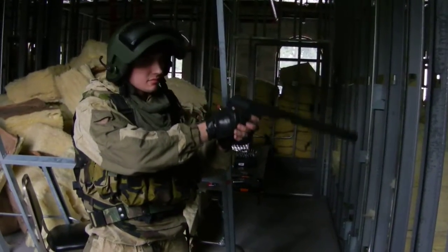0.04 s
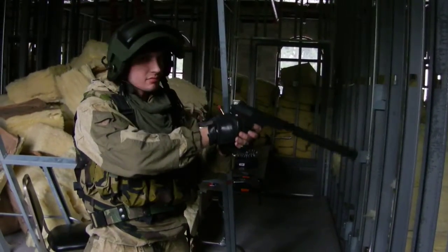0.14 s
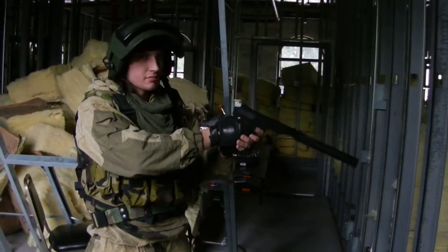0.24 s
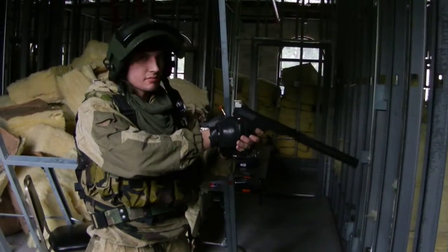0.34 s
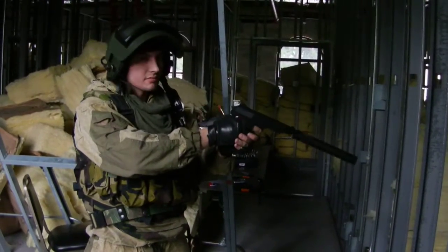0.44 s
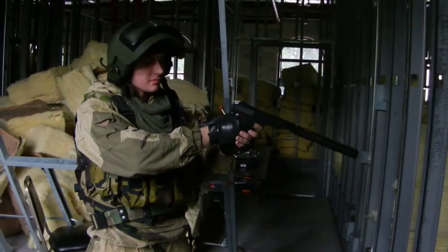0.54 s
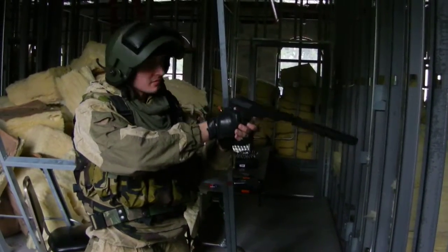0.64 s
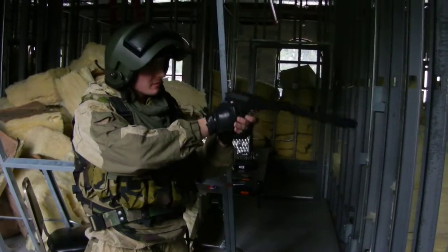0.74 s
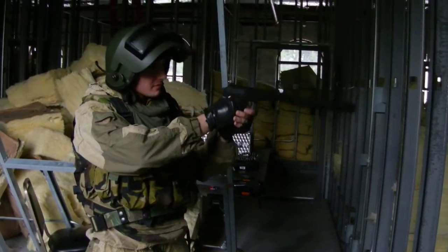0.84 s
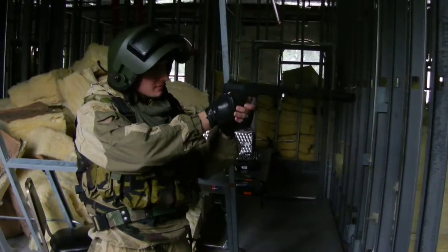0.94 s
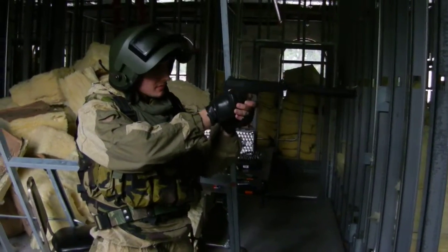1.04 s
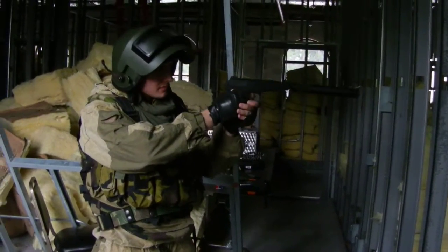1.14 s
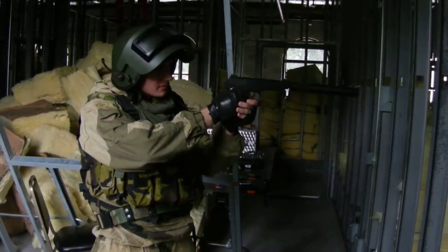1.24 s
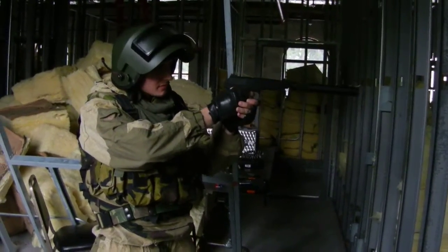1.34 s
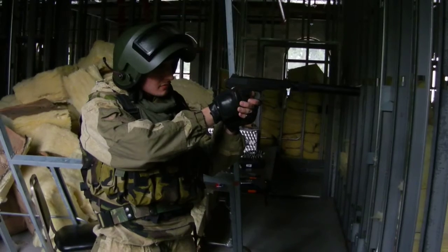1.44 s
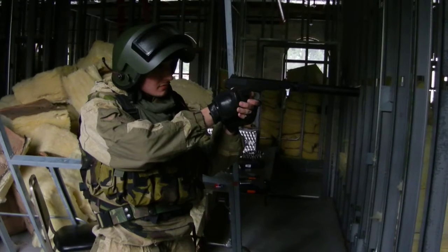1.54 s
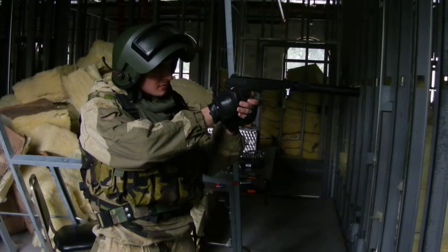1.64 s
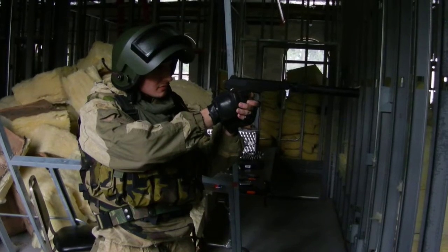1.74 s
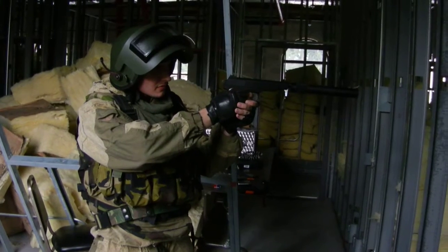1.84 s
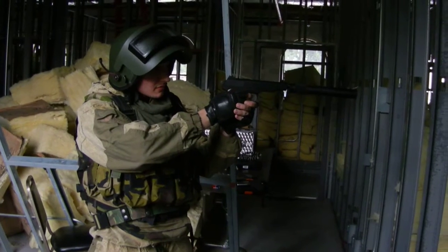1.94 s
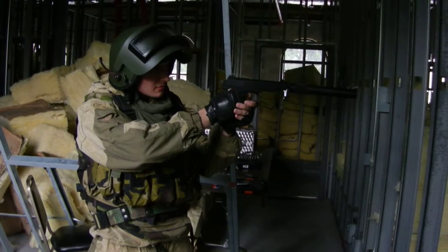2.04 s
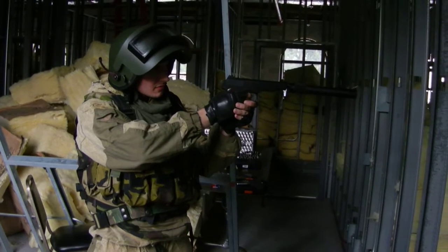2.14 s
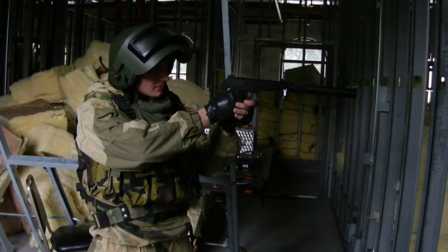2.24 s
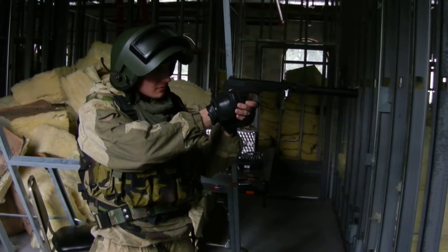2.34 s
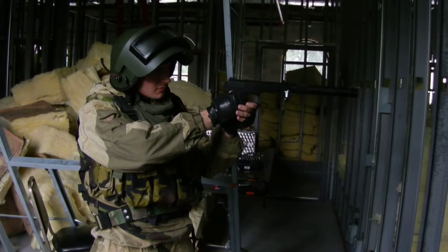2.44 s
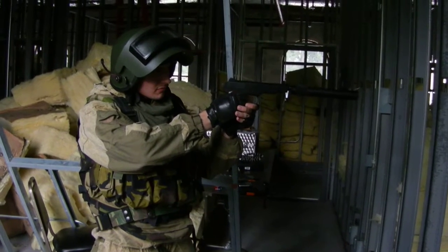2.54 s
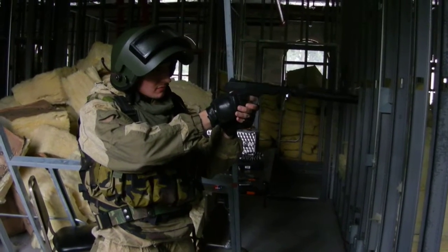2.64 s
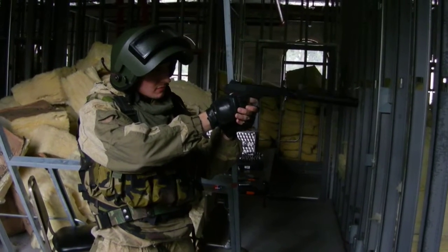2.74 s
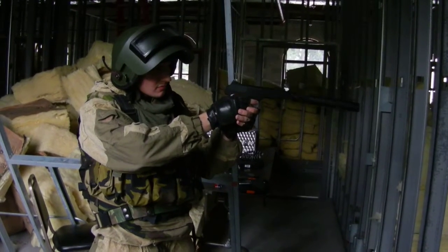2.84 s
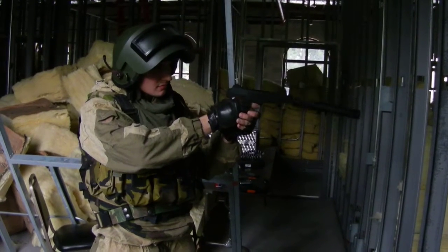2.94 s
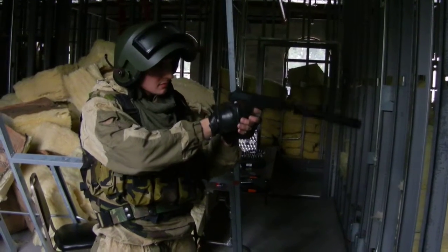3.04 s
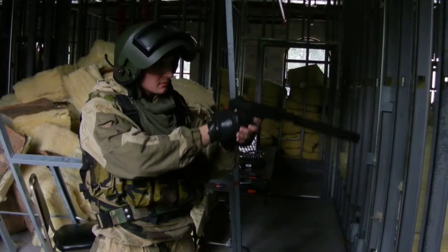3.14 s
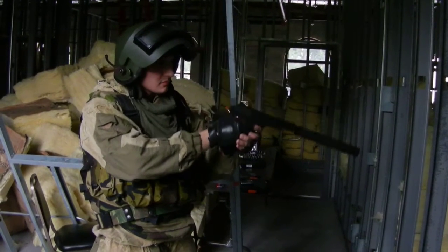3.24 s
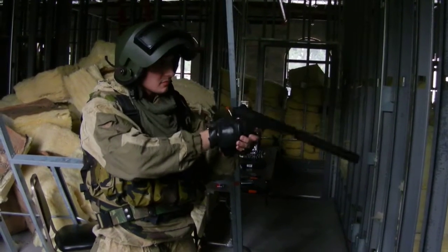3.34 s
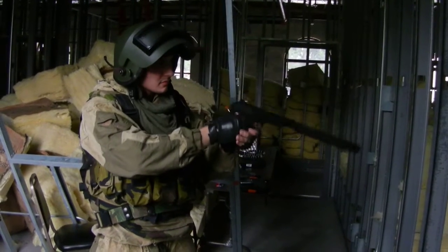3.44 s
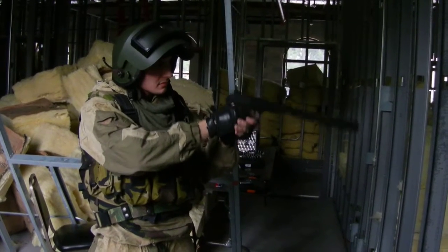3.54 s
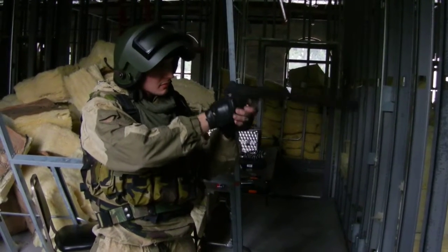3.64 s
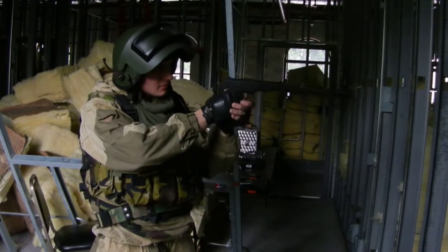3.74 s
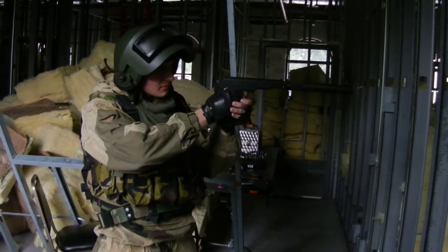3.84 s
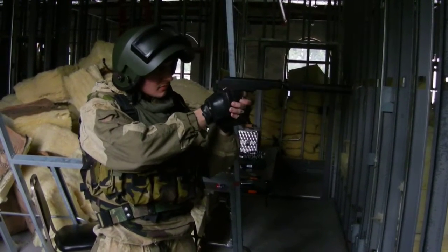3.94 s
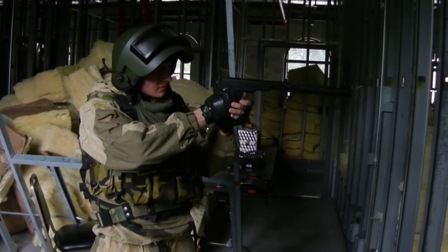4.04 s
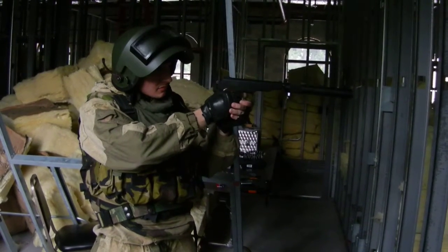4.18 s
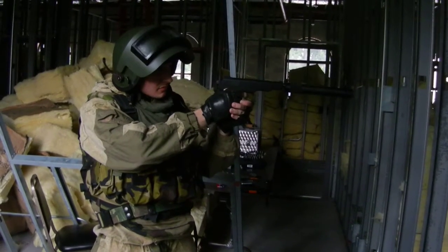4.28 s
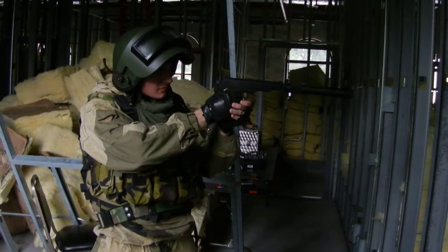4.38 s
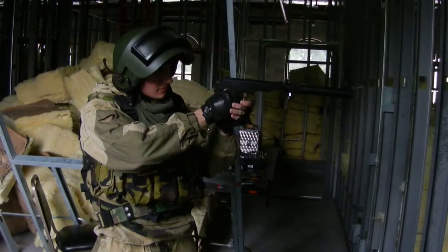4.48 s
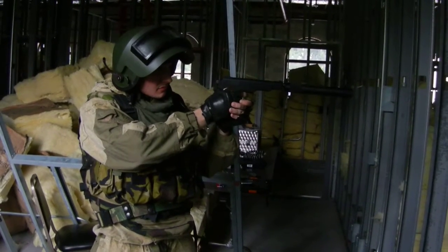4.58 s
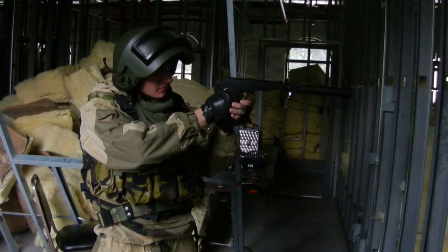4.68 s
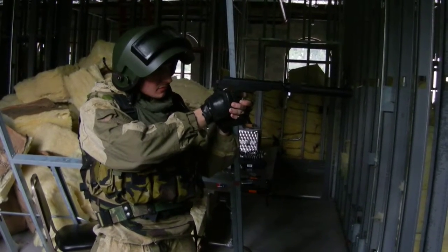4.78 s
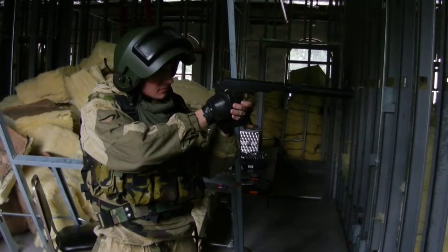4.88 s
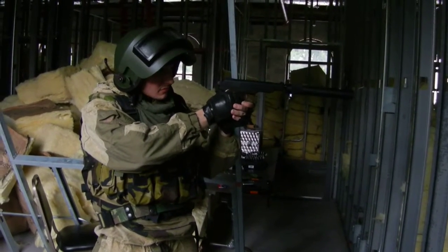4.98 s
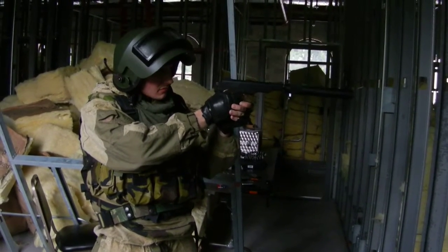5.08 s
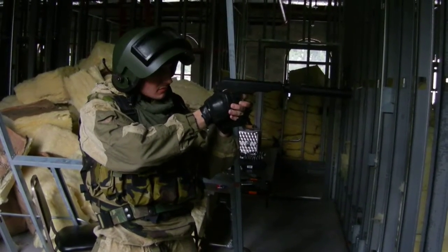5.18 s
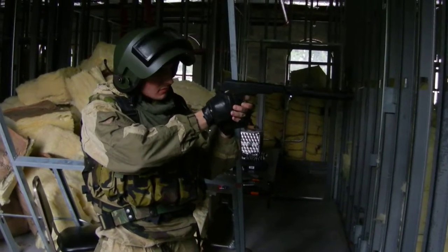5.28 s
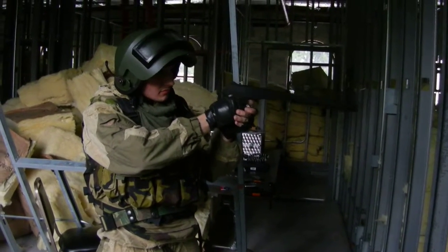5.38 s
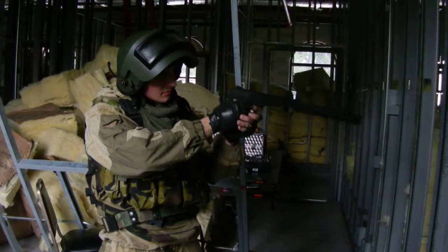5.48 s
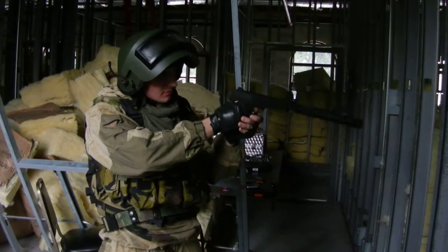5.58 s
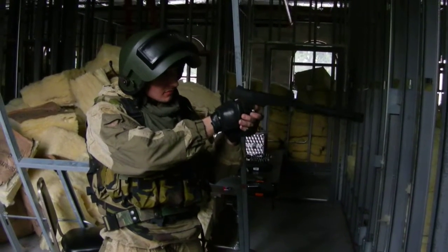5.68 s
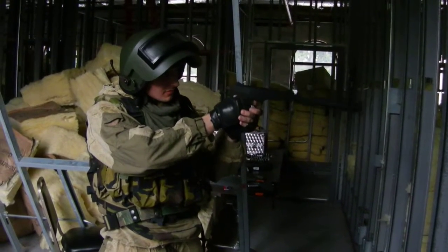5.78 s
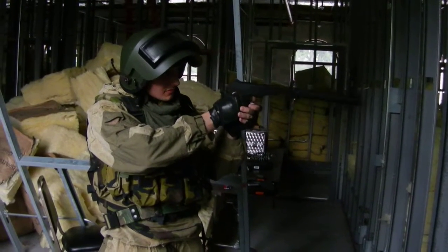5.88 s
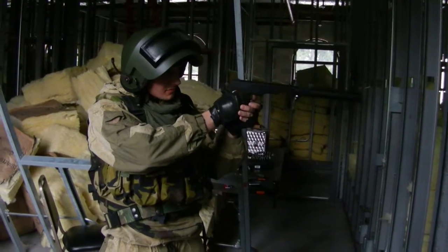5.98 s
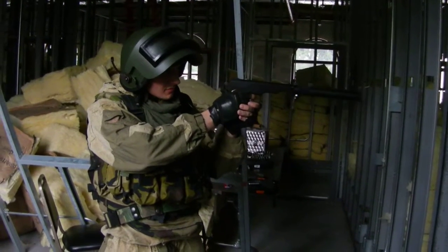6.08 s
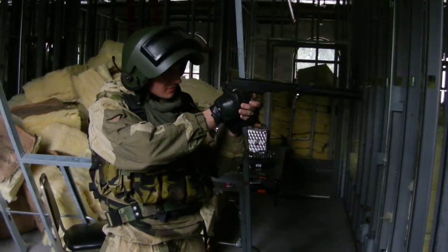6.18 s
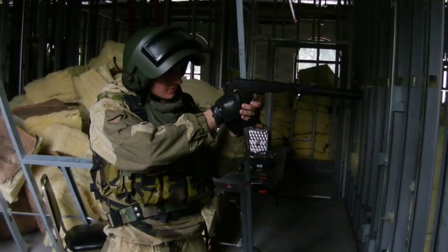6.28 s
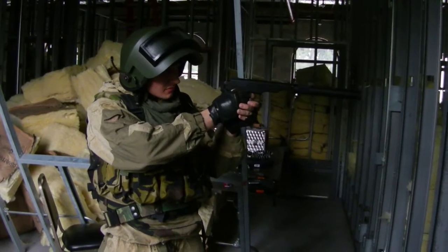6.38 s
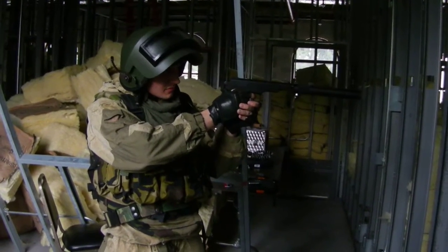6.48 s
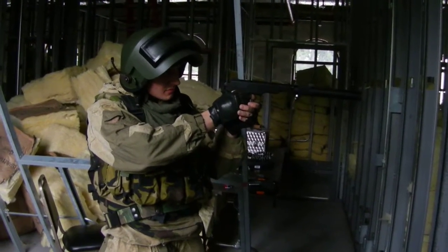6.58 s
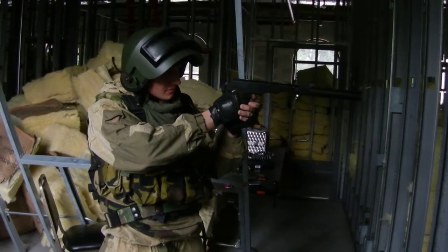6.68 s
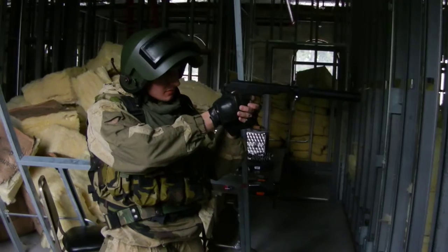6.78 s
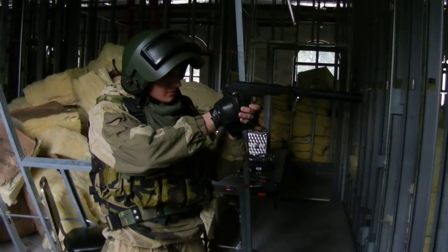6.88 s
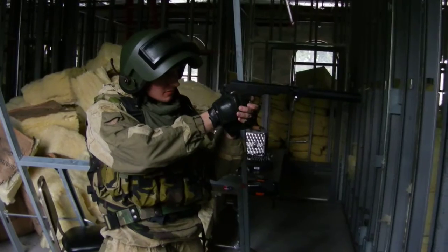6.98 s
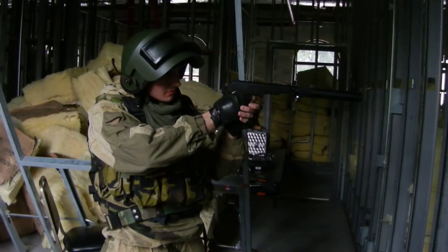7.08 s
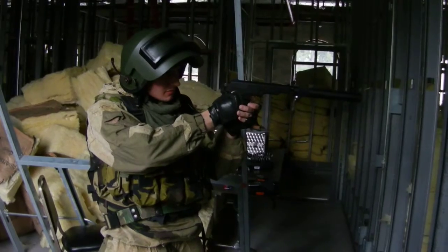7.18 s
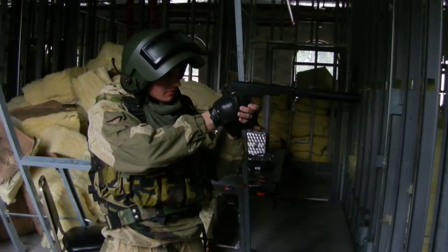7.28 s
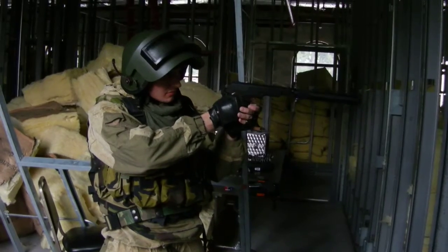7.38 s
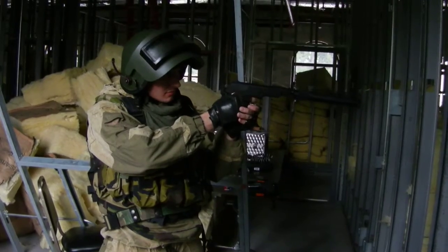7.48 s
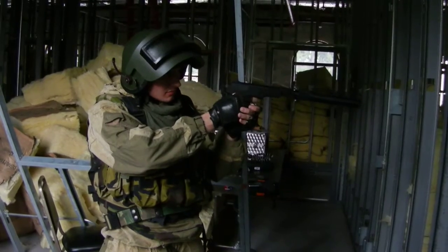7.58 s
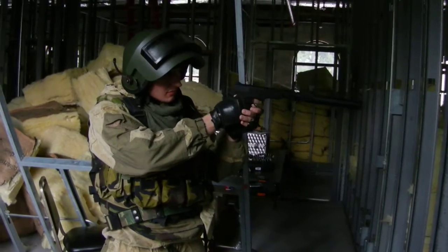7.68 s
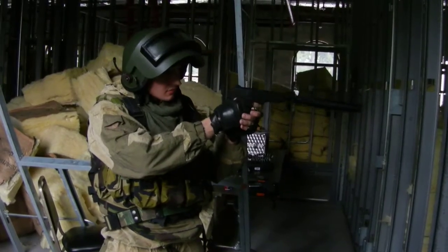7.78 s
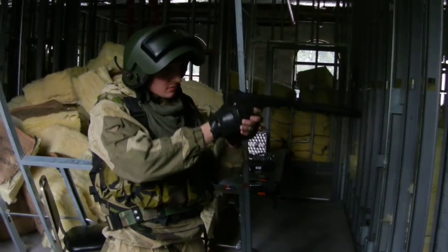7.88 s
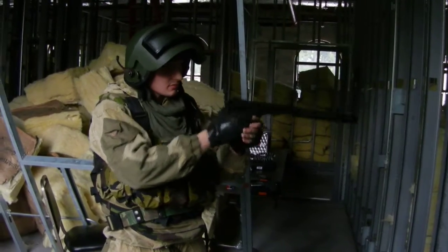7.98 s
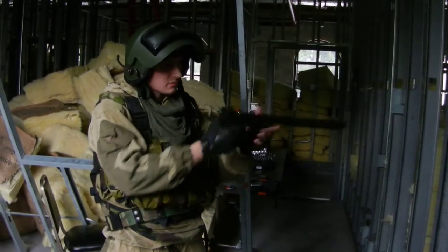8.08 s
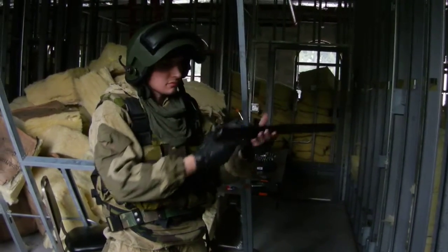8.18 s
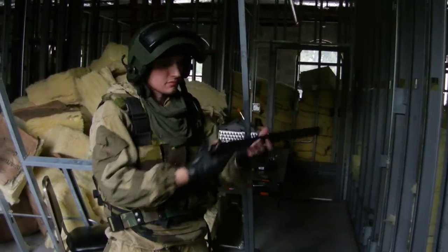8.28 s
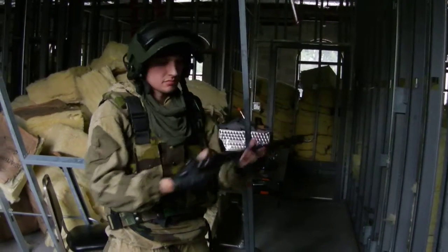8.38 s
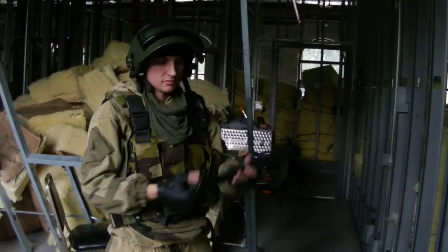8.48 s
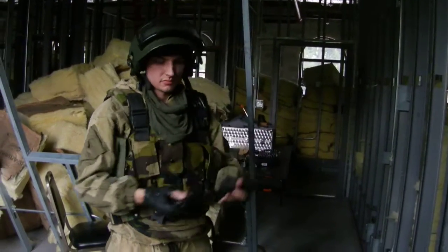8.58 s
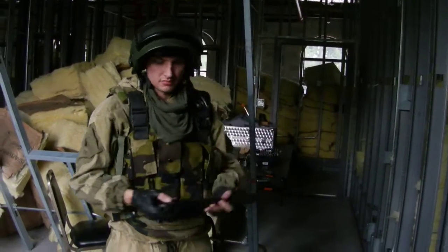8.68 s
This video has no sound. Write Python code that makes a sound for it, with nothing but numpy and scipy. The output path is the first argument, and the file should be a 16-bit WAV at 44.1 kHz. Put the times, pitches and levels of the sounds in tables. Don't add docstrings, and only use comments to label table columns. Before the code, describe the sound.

Three spaced pistol pops crack sharply close by, each rattling in its tube and echoing briefly through a bare steel-framed hall, then gear rustles.

```python
import sys
import numpy as np
from scipy import signal
from scipy.fft import rfft, irfft, next_fast_len
from scipy.io import wavfile
from scipy.ndimage import uniform_filter1d, map_coordinates

SR = 44100
rng = np.random.default_rng(int(sys.argv[2]) if len(sys.argv) > 2 else 0)


def voltage_ratio(decibels):
    exponent = np.asarray(decibels, float) / 20
    return 10 ** exponent


def master_out(mix):
    frames = np.transpose(np.atleast_2d(mix))
    ceiling = np.clip(frames, -1, 1)
    pcm = np.round(ceiling * 32767).astype(np.int16)
    wavfile.write(sys.argv[1], SR, pcm)


N = 384540

# freq_hz, likeness [0-1, negative = opposed]
FLOOR_LIKENESS = [(60, 0.54), (150, 0.67), (380, -0.46), (950, -0.51), (2380, -0.54), (5980, -0.44),
                  (15000, -0.23)]
# freq_hz, likeness [0-1]
HALL_LIKENESS = [(60, .75), (130, .87), (300, .95), (700, .98), (1500, .93), (3000, .8), (6500, .1),
                 (15000, .1)]
# freq_hz, density_db_per_hz
WALL_ECHO = [(29, -57.5), (50, -32), (119, -14), (329, -18.5), (408, -1), (520, -11), (678, -11),
             (802, -9.5), (1120, -14.5), (1500, -6.5), (1820, -15), (2320, -8), (3580, -13), (10600, -15.5),
             (16000, -19.5)]


def unit(x):
    return x / np.sqrt(np.mean(x ** 2) + 1e-20)


def along(points, hz):
    f, v = np.transpose(points)
    return np.interp(np.log(hz + 1), np.log(f + 1), v)


def wobble(rate_hz, size=N):
    knots = rng.standard_normal(int(size * rate_hz / SR) + 4)
    return map_coordinates(knots, [np.arange(size) * rate_hz / SR])


def filtered(x, response):
    m = next_fast_len(x.shape[-1] + 8192)
    spectrum = rfft(x, m) * response(np.fft.rfftfreq(m, 1 / SR))
    return irfft(spectrum, m)[..., :x.shape[-1]]


def spread(pair, likeness):
    def mid_side(hz):
        angle = np.arccos(np.clip(along(likeness, hz), -1, 1)) / 2
        return np.array([np.cos(angle), np.sin(angle)])

    mid, side = filtered(pair, mid_side)
    return np.array([mid + side, mid - side])


def noise(spectrum, size):
    return unit(filtered(rng.standard_normal((2, size)), lambda hz: voltage_ratio(along(spectrum, hz))))


def add(track, sound, s):
    part = track[..., round(s * SR):][..., :sound.shape[-1]]
    part += sound[..., :part.shape[-1]]


def near(colour, size):
    # freq_hz, likeness [0-1]
    port_likeness = [(500, 0.87), (2000, 1), (4000, 0.15), (8000, .1), (14000, 0.2)]
    return spread(noise(colour, size), port_likeness)


def hall(colour, early_db, early_s, rise_s):
    # freq_hz, t60_s
    hall_t60 = [(80, .22), (250, .34), (800, .46), (2500, .55), (6000, .52), (9000, .47), (12000, .38),
                (15500, .31)]
    hz, t, z = signal.stft(spread(noise(colour, SR), HALL_LIKENESS), SR, nperseg=512, noverlap=320)
    late = voltage_ratio(-early_db - 60 * t / along(hall_t60, hz)[:, None])
    early = voltage_ratio(-60 * t / early_s)
    comb = voltage_ratio(3.5 * rng.standard_normal((len(hz), 1)) * np.minimum(t / .15, 1))
    tail = signal.istft(z * (late + early) * comb, SR, nperseg=512, noverlap=320)[1]
    return tail * (1 - np.exp(-np.arange(tail.shape[1]) / SR / rise_s))


def floor():
    # freq_hz, density_db_per_hz
    open_floor = [(18, -58.5), (30, -28), (70, -3), (131, -3.5), (194, -10), (221, -14), (266, -22),
                  (394, -10.5), (632, -19.5), (760, -21), (937, -22.5), (2060, -25.5), (6550, -37),
                  (12300, -41), (16000, -45.5)]
    # start_s, reopened_after_s, depth [0-1], settled_db, rumble_db
    ducks = [
        (-.3, 1.25, 0.94, 2.5, -1),
        (2.391, 1.63, 0.99, 1.5, -1.5),
        (5.03, 1.656, 1, 1.5, 1.5),
        (7.21, 1.32, 0.87, 1, 2),
    ]
    # centre_hz, open_db, shut_by_db, held_s, reopening_bend [exponent]
    regions = [(220, -0.5, 17, 0.61, 1.43), (815, 1, 7, 0.28, 0.89), (3040, -1.5, 18, 0.62, 1.57),
               (8000, -1, 40.5, 0.27, 1.02), (14000, 0.5, 45, 0.52, 2.4)]
    shutting_s = .22
    hz, t, z = signal.stft(spread(noise(open_floor, N), FLOOR_LIKENESS), SR, nperseg=1024)
    samples = np.minimum((t * SR).astype(int), N - 1)
    start_s, reopen_s, depth, settled_db, rumble_db = np.transpose(ducks)
    last = np.maximum(np.searchsorted(start_s, t) - 1, 0)
    since_s = t - start_s[last]
    centre_hz, open_db, shut_db, held_s, bend = np.transpose(regions)[:, :, None]
    reopening = np.clip((reopen_s[last] - since_s) / (reopen_s[last] - held_s), 0, 1) ** bend
    shut = depth[last] * reopening * np.clip(since_s / shutting_s, 0, 1)
    gate_db = open_db + settled_db[last] - shut_db * shut
    gate_db[0] += rumble_db[last] + 2.6 * wobble(15)[samples]
    gate_db[1] += 1.1 * wobble(7)[samples]
    share = np.array([along(list(zip(centre_hz[:, 0], row)), hz) for row in np.eye(len(regions))])
    return voltage_ratio(-48) * signal.istft(z * voltage_ratio(share.T @ gate_db), SR, nperseg=1024)[1][:, :N]


def stud():
    # pitch_hz, level_db, swell_db_per_s
    low_modes = [(387.6, -58, -3), (417, -59.5, -1.5), (535, -64, 4.5), (610, -65.5, 4)]
    # pitch_hz, level_db, t60_s
    high_modes = [(1287, -12, 3.8), (1916, -24, 5), (1965, -22, 4.5), (2223, 0, 4.7), (2439, -16, 1.4),
                  (3305, -17, .8), (4958, -24, .6)]
    # freq_hz, density_db_per_hz
    drone_colour = [(300, -7), (390, -3), (460, -3.5), (540, 1), (620, -2), (800, -10), (1400, -41.5)]
    # freq_hz, density_db_per_hz
    glow_colour = [(350, -24), (600, 5.5), (812, -8), (1310, -7), (1680, -11), (2270, -7), (3000, -19.5),
                   (6000, -32), (16000, -100)]
    high_db, low_db, drone_db, fade_db_per_s = -50 + 6.0, 5, -53, 13.5
    damped_s, damp_db_per_s = 1.13, 22.5
    blow_ago_s, blow_hall_db = .27, -18.5
    size = 2 * SR
    t = np.arange(size) / SR

    def tone(hz, waver_db):
        phase = 1.53 * wobble(10, size) + 0.44 * rng.standard_normal((2, 1))
        return voltage_ratio(waver_db * wobble(4.65, size)) * np.sin(2 * np.pi * hz * t + phase)

    high = sum(voltage_ratio(db - 60 * t * (1 / t60 - 1 / 5)) * tone(hz, 1.2) for hz, db, t60 in high_modes)
    low = sum(voltage_ratio(db + swell * t) * tone(hz, 0.99) for hz, db, swell in low_modes)
    drone = voltage_ratio(drone_db) * spread(noise(drone_colour, size), FLOOR_LIKENESS)
    rings = voltage_ratio(high_db - fade_db_per_s * t) * high + voltage_ratio(low_db) * low + drone
    choke = voltage_ratio(-damp_db_per_s * np.maximum(t - damped_s, 0))
    afterglow = voltage_ratio(-51 - 60 * t / 2.95) * spread(noise(glow_colour, size), HALL_LIKENESS)
    blow = hall(WALL_ECHO, early_db=1.5, early_s=.1, rise_s=.007)
    add(afterglow, voltage_ratio(blow_hall_db) * blow[:, round(blow_ago_s * SR):], 0)
    fade_out = np.minimum(4 * (t[-1] - t), 1)
    return np.pad((choke * rings + afterglow) * fade_out, ((0, 0), (0, N - size)))


def click(db, hz, ratio, bright_db, t60_s):
    t = np.arange(SR // 5) / SR
    colour = [(hz / ratio / 2, -35), (hz / ratio, -6), (hz, 0), (hz * 1.15, -3),
              (max(6500, hz * 1.19), bright_db - 9.0), (8000, bright_db - 17.5),
              (12500, bright_db - 11.0), (14000, bright_db - 13.5), (16000, bright_db - 27.5)]
    out = voltage_ratio(db - 24) * hall(colour, early_db=8, early_s=.12, rise_s=.006)
    attack = 1 - np.exp(-t / 0.00023)
    add(out, voltage_ratio(db - 2.0 - 60 * t / t60_s) * attack * near(colour, len(t)), 0)
    return out


def handling():
    # sear_s, sear_db, take_up_db
    pulls = [
        (2.3399, -20, -39),
        (4.9842, -22.5, -39),
        (7.1536, -24.5, -38.5),
    ]
    # start_s, peak_db
    buckles = [
        (7.9608, -52),
        (8.1273, -31),
        (8.3614, -45),
        (8.4503, -44),
        (8.581, -33),
    ]
    clink_s = [
        .6256,
        .627,
        8.135,
        8.13,
    ]
    # peak_db, pitch_hz, t60_s
    clinks = [(-32.5, 2800, .008), (-44, 2960, .2), (-49.5, 6300, 0.14), (-44, 2460, .14)]
    # time_s, level_db
    rustle = [
        (8.2, -60.5),
        (8.33, -56.5),
        (8.4, -53.5),
        (8.58, -48),
        (8.72, -48.5),
    ]
    # freq_hz, density_db_per_hz
    cloth_colour = [(290, -34), (500, -0.5), (557, -17), (763, -3.5), (1360, -11.5), (1850, -9.5),
                    (2080, -10), (9000, -32.5), (11700, -42), (19800, -120)]
    # freq_hz, density_db_per_hz
    thump_colour = [(30, -35), (90, -4.5), (180, -1), (260, -18.5), (500, -39)]
    take_up_lead_s = .031
    out = np.zeros((2, N))
    for s, db, t_db in pulls:
        add(out, click(t_db, hz=2302, ratio=1.5, bright_db=-12, t60_s=0.1), s - take_up_lead_s)
        add(out, click(db, hz=2600, ratio=1.8, bright_db=1.3, t60_s=0.029), s)
    for s, db in buckles:
        add(out, click(db, hz=2500, ratio=2.2, bright_db=-20, t60_s=.012), s)
    for s, (db, hz, t60_s) in zip(clink_s, clinks):
        add(out, click(db, hz, ratio=1.15, bright_db=-19, t60_s=t60_s), s)
    time_s, level_db = np.transpose(rustle)
    effort_db = np.interp(np.arange(N) / SR, time_s, level_db, -120, -120)
    grain = voltage_ratio(1.6 * wobble(40) + 2.2 * wobble(250))
    cloth = voltage_ratio(effort_db) * unit(grain * spread(noise(cloth_colour, N), HALL_LIKENESS))
    peak_db = effort_db.max()
    thump_db = 3 + peak_db + 1.5 * (effort_db - peak_db) + 2.2 * wobble(15)
    return out + cloth + voltage_ratio(thump_db) * spread(noise(thump_colour, N), HALL_LIKENESS)


def frame(t60_s):
    # centre_hz, width_hz, level_db
    resonances = [(990, 54, 3.5), (640, 160, -2.5), (829, 97, -2.0), (1560, 340, -6.5), (2400, 200, -2),
                  (3200, 300, -7.5), (3700, 70, -6.5), (4870, 950, -10)]
    t = np.arange(SR) / SR

    def peaks(f):
        total = 0
        for k, (c, w, db) in enumerate(resonances):
            total = total + (-1) ** k * voltage_ratio(db) * 1j * f * w / (c * c - f * f + 1j * f * w)
        return total

    hum = spread(unit(filtered(rng.standard_normal((2, SR)), peaks)), HALL_LIKENESS)
    return voltage_ratio(-60 * t / t60_s) * (1 - np.exp(-t / 0.026)) * np.cos(np.pi * t / 2) * hum


def shots():
    shot_s = [2.3879, 5.0318, 7.2082]
    # pop_db, crack_db, rush_db, hall_db, steel_ring_db
    levels = [
        (-6, -11, -25, -14.5, 1.5),
        (-6, -13.5, -27.5, -15, 0.5),
        (-5, -12, -28.5, -14, -0.5),
    ]
    # delay_s, size [ratio]
    repeats = [(0, 1.1), (.0024, .35), (.00475, .75), (.0071, .5), (.0095, .25), (.0119, .3), (.0143, .15),
               (.0195, .3)]
    # pitch_hz, level_db, t60_s
    shell = [(412, -5, 0.046), (139.9, -24.5, 0.18), (194, -18.5, 0.06), (2280, -15.5, 0.057),
             (2457, -18.5, 0.12), (3000, -13.5, 0.012), (4320, -22, 0.035), (5170, -29.5, 0.1),
             (6550, -27.5, 0.036)]
    # freq_hz, density_db_per_hz
    crack_colour = [(590, -41.5), (1000, -11), (1590, -4), (1870, -8.5), (2410, -3.5), (3460, -11.5),
                    (5760, -11.5), (6250, -11), (7620, -22.5), (12700, -15), (16000, -29.5)]
    # freq_hz, density_db_per_hz
    slam_colour = [(2000, -30.5), (4000, -7), (6500, -4), (8000, -12.5), (11500, 0), (16000, -12.5)]
    # freq_hz, density_db_per_hz
    rush_colour = [(180, -33.5), (300, -3), (1080, -9), (1430, -2), (2250, -6.5), (2440, 3.5), (2740, -9),
                   (11500, -10), (16000, -14)]
    slam_delay_s, slam_over_crack_db, slam_t60_s = .0093, 3, .022
    out = np.zeros((2, N))
    t = np.arange(SR // 5) / SR
    attack = 1 - np.exp(-t / .0003)
    lead = np.arange(-SR // 13, 0) / SR
    to_peak = lead + .006
    swell = voltage_ratio(-23) + voltage_ratio(430 * to_peak - 4 * (lead < -.009) - 900 * np.maximum(to_peak, 0))
    for s, (pop_db, crack_db, rush_db, hall_db, steel_db) in zip(shot_s, levels):
        add(out, voltage_ratio(rush_db) * swell * near(rush_colour, len(lead)), s + lead[0])
        pop = 0
        for delay_s, size in repeats:
            u = t - delay_s
            pulse = np.exp(-((u - .001) / .0008) ** 2) * np.cos(2 * np.pi * 830 * (u - .00075))
            pop = pop + size * voltage_ratio(rng.normal(0, 1.0)) * pulse
        ring = 0
        for hz, db, t60_s in shell:
            mode_db = db + steel_db * (hz > 2000) + rng.normal(0, 0.27)
            ring = ring + voltage_ratio(mode_db - 60 * t / t60_s) * np.sin(2 * np.pi * hz * t)
        chatter = voltage_ratio(2.2 * wobble(300, len(t)))
        crack = voltage_ratio(crack_db - 60 * t / 0.081) * chatter * near(crack_colour, len(t))
        add(out, attack * (voltage_ratio(pop_db) * (pop + ring) + crack), s)
        slam = voltage_ratio(crack_db + slam_over_crack_db - 60 * t / slam_t60_s) * near(slam_colour, len(t))
        add(out, attack * slam, s + slam_delay_s)
        add(out, voltage_ratio(hall_db) * hall(WALL_ECHO, early_db=7.5, early_s=0.11, rise_s=0.0089), s + .003)
        add(out, voltage_ratio(hall_db + steel_db - 26.5) * frame(t60_s=1.394), s)
    return out


def scene():
    return floor() + stud() + handling() + shots()


def muted(x):
    # freq_hz, level_db_per_43_hz
    threshold = [(5000, -125), (6500, -108), (9000, -104), (13000, -102), (16000, -98)]
    hz, _, z = signal.stft(x, SR, nperseg=1024)
    power = uniform_filter1d(np.mean(np.abs(z) ** 2, 0), size=4, axis=0)
    power = uniform_filter1d(power, size=3, axis=1)
    limit = voltage_ratio(along(threshold, hz))[:, None] ** 2
    keep = .1 + .9 / (1 + (limit / (np.abs(power) + 1e-20)) ** 4)
    return signal.istft(z * keep, SR, nperseg=1024)[1][:, :N]


def roll_off(x):
    return signal.sosfilt(signal.butter(12, 16470, fs=SR, output="sos"), x)


def record(dry):
    held = dry / (1 + np.abs(dry) ** 5) ** (1 / 5)
    band = lambda hz: (1j * hz / (52 + 1j * hz)) ** 2 * (hz < 15950)
    mix = 1.03 * muted(filtered(held, band))
    return roll_off(mix)


dry = scene()
out = record(dry)
master_out(out)
```